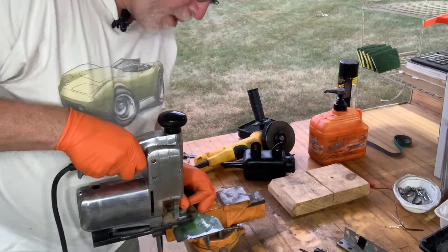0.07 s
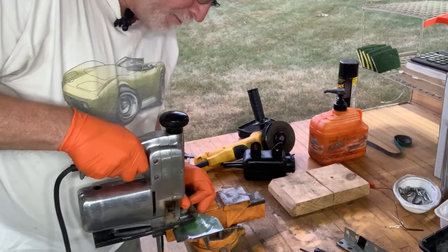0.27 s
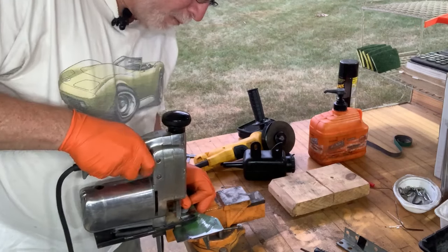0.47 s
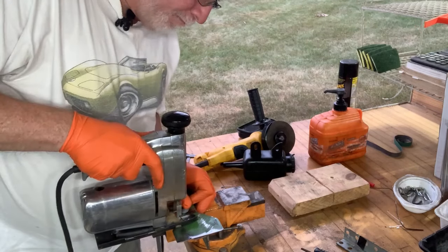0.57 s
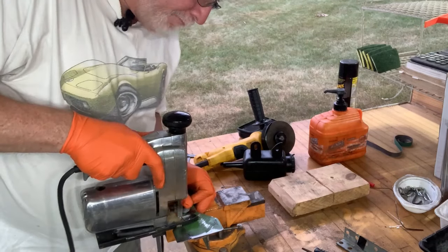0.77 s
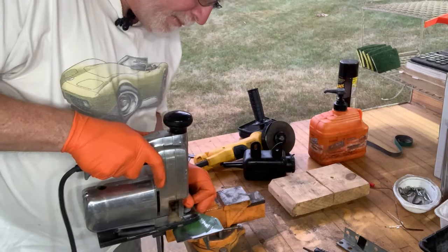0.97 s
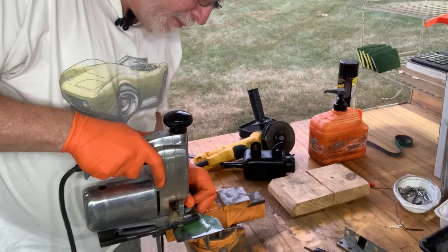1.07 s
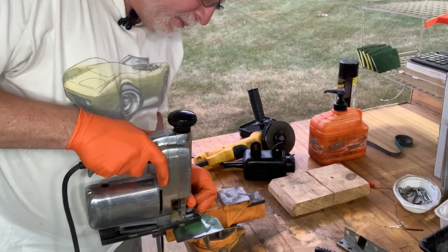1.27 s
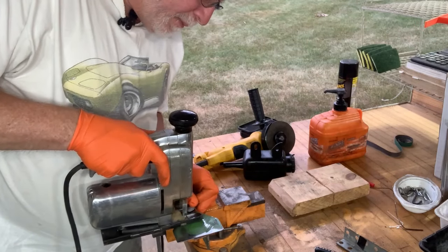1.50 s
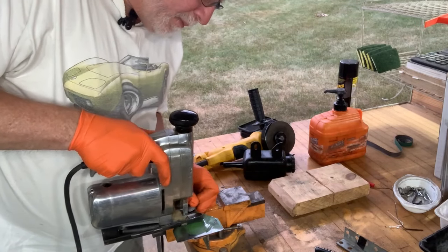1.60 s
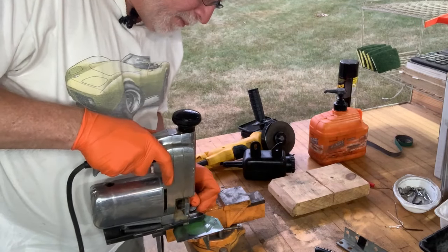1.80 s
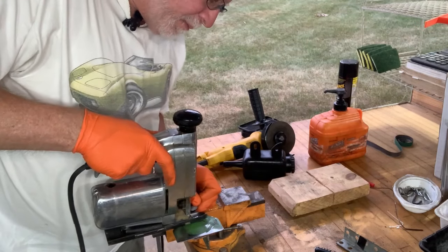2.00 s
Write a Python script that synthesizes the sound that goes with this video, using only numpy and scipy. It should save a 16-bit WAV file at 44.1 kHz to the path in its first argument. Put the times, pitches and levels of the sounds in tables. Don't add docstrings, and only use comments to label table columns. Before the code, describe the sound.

A corded metal-cased saw starts after a brief quiet, blasting loud and shrieking, then drops abruptly to a steady hissing whine while cutting iron on a workbench, with short squeals, heard close in mono.

```python
import sys
import numpy as np
from scipy import signal
from scipy.io import wavfile
from scipy.ndimage import uniform_filter1d

SR = 44100
rng = np.random.default_rng(int(sys.argv[2]) if len(sys.argv) > 2 else 0)


def generate_wav(signal):
    frames = np.transpose(np.atleast_2d(signal))
    scaled = np.clip(frames, -1, 1) * 32767
    pcm = np.round(scaled).astype(np.int16)
    wavfile.write(sys.argv[1], SR, pcm)


def decibels_to_gain(level_db):
    exponent = np.asarray(level_db, float) / 20
    return 10 ** exponent


N = 90404
TIME_S = np.arange(N) / SR
STRAIN_S = (0.387, 0.449)

# (time [s], level [dB])
LEVEL = [
    (.18, -80),
    (.204, -67),
    (.216, -18),
    (.242, 10.5),
    (.284, 18),
    (.376, 16.5),
    (.41, 8),
    (.436, 1),
    (.55, 1),
    (2.05, 0),
]


def evened(x):
    return x / np.sqrt(np.mean(x ** 2) + 1e-20)


def noise():
    return rng.standard_normal(N)


def curve(rows, column=1):
    rows = np.array(rows)
    return np.interp(TIME_S, rows[:, 0], rows[:, column])


def drift(span_s):
    size = max(int(span_s * SR), 2)
    return evened(uniform_filter1d(uniform_filter1d(noise(), size), size))


def resonate(x, hz, width_hz):
    turn = np.exp(2j * np.pi * np.cumsum(hz * np.ones(len(x))) / SR)
    pole = np.exp(-np.pi * width_hz * 1.55 / SR)
    smooth = signal.lfilter([1], [1, -pole], x / turn)
    smooth = signal.lfilter([1], [1, -pole], smooth)
    return (turn * smooth).real


def wavering(hz, wander_hz, span_s, beads_db):
    phase = 2 * np.pi * np.cumsum(hz + wander_hz * drift(span_s)) / SR
    return evened(decibels_to_gain(beads_db * drift(span_s)) * np.sin(phase))


def motor():
    # (frequency [Hz], density [dB per Hz])
    run_air = [(24, -48), (40, -12.5), (303, -14.5), (420, -13.5), (1660, -11), (2480, -6.5), (3020, -8.5),
               (4290, -10.5), (15800, -23)]
    start_air = [(24, -46), (40, -12), (512, -9), (888, -8.5), (2030, -5.5), (2880, -1), (4740, -11.5),
                 (5940, -8), (15800, -16)]
    # (frequency [Hz], width [Hz], level [dB], extra while speed settles [dB])
    run_modes = [(632, 110, -59, 10.5), (858, 85, -51, -4.5), (2087, 140, -44, 5), (2480, 280, -43.5, -6),
                 (2820, 55, -48, 5), (3400, 290, -47.5, 5.5), (3820, 310, -47.5, -2),
                 (4050, 420, -43.5, -0.5), (4253, 370, -42, -5.5), (5225, 330, -46, -5),
                 (5890, 330, -46.5, 2.5)]
    # (frequency [Hz], width [Hz], level [dB])
    start_modes = [(2200, 70, -49), (2840, 61, -69), (3070, 310, -41.5), (3400, 460, -50.5),
                   (4010, 690, -38), (5230, 200, -45), (5940, 210, -36), (6890, 320, -45.5)]
    jolt_modes = [(291, 610, -63), (900, 254, -42), (1600, 400, -42.5)]

    settled = np.interp(TIME_S, STRAIN_S, [0, 1])
    jolt = np.interp(TIME_S, (0.358, 0.382), [1, 0])
    air = hiss(start_air)
    low_air = signal.sosfiltfilt(signal.butter(3, 2010, fs=SR, output="sos"), air)
    air = air - 0.19 * (1 - jolt) * low_air
    start = decibels_to_gain(-32.5) * air + casing(start_modes) + jolt * casing(jolt_modes)
    run = decibels_to_gain(-33.5) * hiss(run_air) + casing(run_modes) + hum()
    mix = np.sqrt(1 - settled) * start + np.sqrt(settled) * run + gear_shriek()
    return (TIME_S > LEVEL[0][0]) * decibels_to_gain(curve(LEVEL)) * mix


def hiss(points):
    size, patch_db = 1024, 0.8
    bin_hz = np.fft.rfftfreq(size, 1 / SR)
    real, imag, patches = rng.standard_normal((N // 256 + 5, 513, 3)).T
    patches = evened(uniform_filter1d(uniform_filter1d(patches, 8, 0), 8, 1))
    hz, level_db = np.transpose(points)
    shape_db = np.interp(np.log(bin_hz + 1), np.log(hz + 1), level_db)[:, None]
    spectra = (real + 1j * imag) * decibels_to_gain(shape_db + patch_db * patches)
    return evened(signal.istft(spectra, nperseg=size, noverlap=768)[1][:N])


def casing(modes):
    flutter_db = 1.2
    early = np.interp(TIME_S, (0.36, 1.25), [1, 0])
    out = np.zeros(N)
    for hz, width_hz, db, *extra_db in modes:
        level_db = db + sum(extra_db) * early + flutter_db * drift(0.031)
        out += decibels_to_gain(level_db) * evened(resonate(noise(), hz, width_hz))
    return out


def gear_shriek():
    # (time [s], frequency [Hz], level against heard level [dB])
    track = [
        (.2, 2800, -27),
        (.26, 2830, -41),
        (.31, 2900, -38),
        (.35, 2980, -40.5),
        (.4, 2900, -39),
        (.44, 2850, -29.5),
        (.47, 2840, -71),
    ]
    return decibels_to_gain(curve(track, 2)) * wavering(curve(track), wander_hz=70.9, span_s=0.00399, beads_db=3.8)


def hum():
    # (time [s], frequency [Hz], level [dB])
    track = [
        (.4, 424, -46),
        (.7, 424, -56),
        (.9, 425, -60),
        (1.1, 426, -51.5),
        (1.35, 426, -55.5),
        (1.45, 424, -60),
        (1.7, 422, -52),
        (2.05, 422, -60),
    ]
    beads_db = 1.5
    shaft = decibels_to_gain(curve(track, 2)) * wavering(curve(track), 5.3, 0.055, beads_db)
    mains = decibels_to_gain(-62.5) * wavering(118.3, 1.6, 0.035, beads_db)
    return shaft + mains


def whine():
    # (time [s], frequency [Hz], level [dB])
    track = [(.4, 2690, -46), (.52, 2631, -39), (.62, 2615, -47), (.7, 2590, -43), (.83, 2540, -35),
             (.92, 2484, -40.5), (1.05, 2480, -37.5), (1.2, 2480, -36.5), (1.38, 2500, -41.5),
             (1.45, 2426, -40.5), (1.57, 2416, -36.5), (1.64, 2470, -47), (1.87, 2455, -48),
             (1.93, 2285, -37), (2.05, 2160, -44)]
    running = np.interp(TIME_S, STRAIN_S, [0, 1])
    tone = wavering(curve(track), wander_hz=40, span_s=0.005, beads_db=2.5)
    return running * decibels_to_gain(curve(track, 2)) * tone


def squeals():
    # (middle [s], length [s], frequency [Hz], level [dB], glide [Hz])
    bursts = [(0.251, 0.033, 1650, -19, -61), (0.269, 0.019, 2870, -10.5, 0.5),
              (.287, 0.012, 2820, -8.5, -2), (0.359, 0.0615, 4050, -17, 702), (0.278, .025, 900, -24, 80),
              (0.229, 0.032, 2160, -37, -2), (0.351, .03, 3050, -15.5, 1), (0.42, 0.04, 2900, -33, 1),
              (0.426, 0.013, 2030, -42, 1), (.452, 0.027, 2050, -24.5, -41.5),
              (0.477, 0.038, 2060, -28, 0.5), (0.504, 0.046, 2045, -30.5, 0), (0.533, 0.044, 2110, -34, 61),
              (0.745, 0.028, 2430, -40, 0), (1.664, 0.028, 2435, -26.5, -4.5),
              (1.685, 0.028, 2470, -21, 1.5), (1.709, 0.021, 2440, -18, 1.5),
              (1.736, 0.041, 2460, -19, -0.5), (1.77, 0.0094, 2440, -35, -3),
              (1.785, 0.023, 2478, -25.5, -4), (1.827, 0.028, 2480, -30, -1.5), (1.859, .024, 2490, -32, 0),
              (1.894, 0.023, 2414, -30, -3)]
    wobble_hz, beads_db, edge_power = 9, 1.2, 0.7
    wobble = drift(0.005)
    wobble = evened(wobble)
    out = np.zeros(N)
    for middle_s, length_s, hz, db, glide_hz in bursts:
        u = np.clip((TIME_S - middle_s) / length_s, -0.5, 0.5)
        phase = 2 * np.pi * np.cumsum(hz + glide_hz * u + wobble_hz * wobble) / SR
        envelope = np.abs(np.cos(np.pi * u)) ** edge_power * (abs(u) < 0.5)
        tone = np.sin(phase) + decibels_to_gain(-21) * np.sin(2 * phase)
        out += decibels_to_gain(db - 1 + beads_db * wobble) * envelope * tone
    return out


def bench():
    # (time [s], level [dB])
    shift = [
        (.06, -108),
        (.08, -73),
        (.107, -59),
        (.125, -65.5),
        (.15, -79),
        (.175, -95),
    ]
    # (frequency [Hz], width [Hz], level [dB])
    modes = [(400, 41, 2.5), (1020, 52, 6), (1517, 29, 0), (1980, 24, -6), (2950, 24, -6), (3910, 110, -16),
             (4510, 37, -18), (6070, 61, -12)]

    rings = sum(decibels_to_gain(db) * evened(resonate(noise(), hz, 1.2 * width_hz)) for hz, width_hz, db in modes)
    band = signal.butter(3, (170, 3930), "band", fs=SR, output="sos")
    scrape = evened(signal.sosfilt(band, noise()))
    heard = (TIME_S > shift[0][0]) & (TIME_S < shift[-1][0])
    slide = heard * decibels_to_gain(curve(shift)) * evened(evened(rings) + decibels_to_gain(-2.5) * scrape)

    thump = evened(resonate(resonate(noise(), 100, 120), 100, 120))
    push = np.interp(TIME_S, (0.19, 0.22), [0, 1]) * (TIME_S < 0.25)
    return slide + decibels_to_gain(-56) * push * thump


def scene():
    mix = motor() + whine() + squeals() + bench()
    return np.array([mix, mix])


def band_limit(x):
    return signal.sosfilt(signal.butter(12, 15900, fs=SR, output="sos"), x)


def record(dry):
    ceiling, mic_top_hz, edge_hz = 1.15, 15500, 15850
    limited = ceiling * np.tanh(dry / ceiling)
    soft = signal.sosfilt(signal.butter(3, mic_top_hz, fs=SR, output="sos"), limited)
    band_edge = signal.firwin(401, edge_hz, window=("kaiser", 9), fs=SR)
    finished = signal.oaconvolve(soft, band_edge[None], "same")
    return band_limit(finished)


dry = scene()
out = record(dry)
generate_wav(out)
```